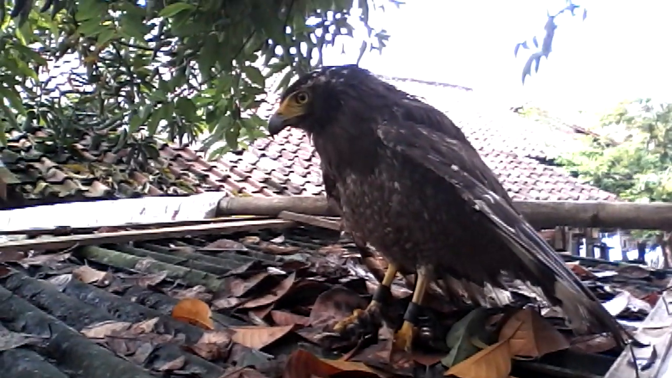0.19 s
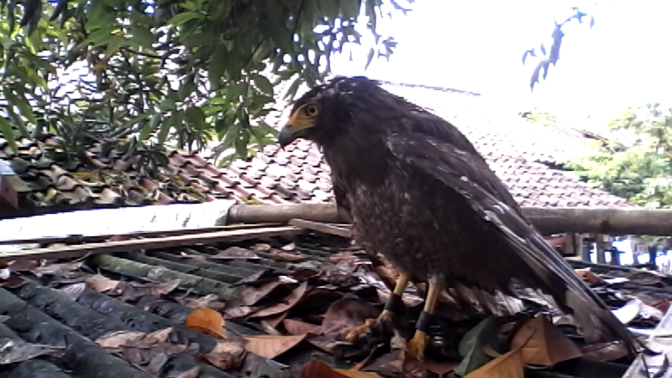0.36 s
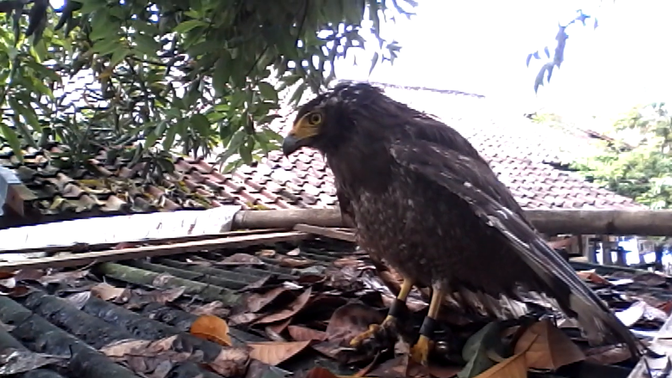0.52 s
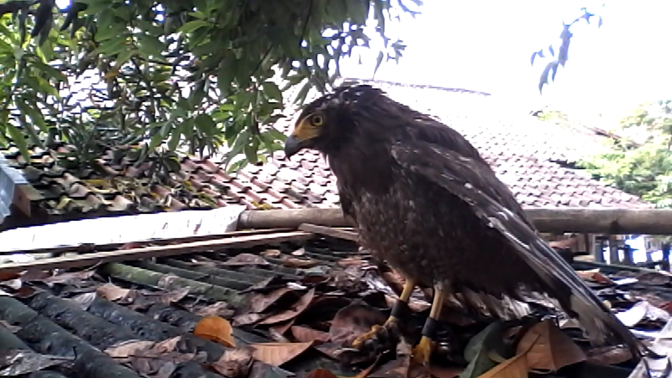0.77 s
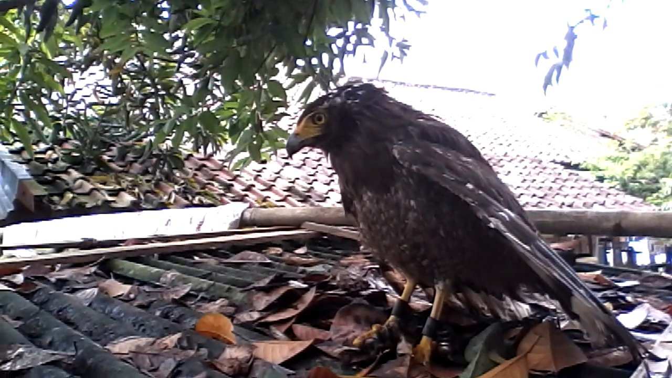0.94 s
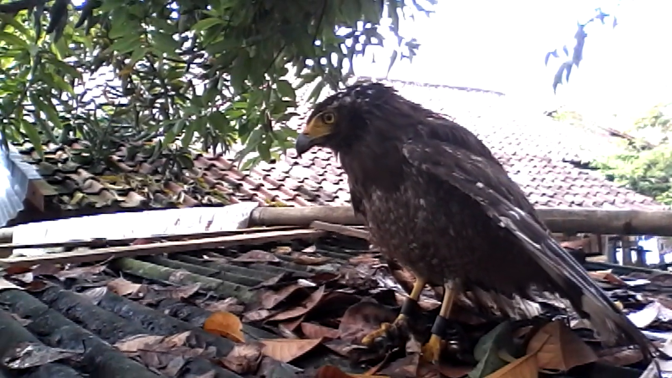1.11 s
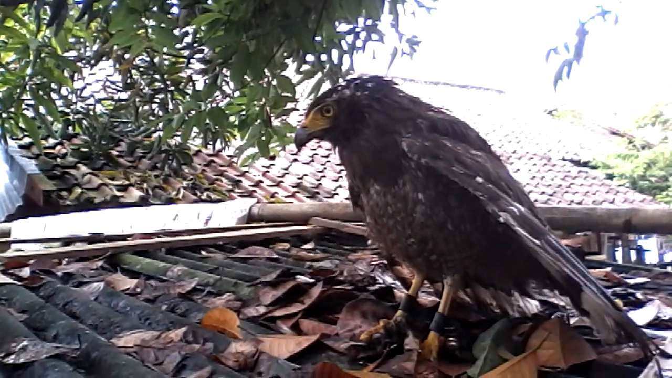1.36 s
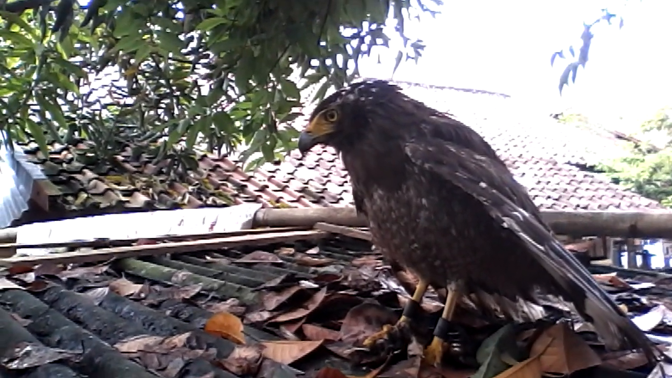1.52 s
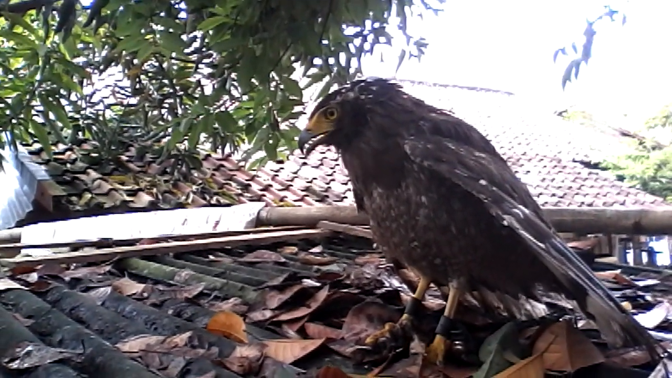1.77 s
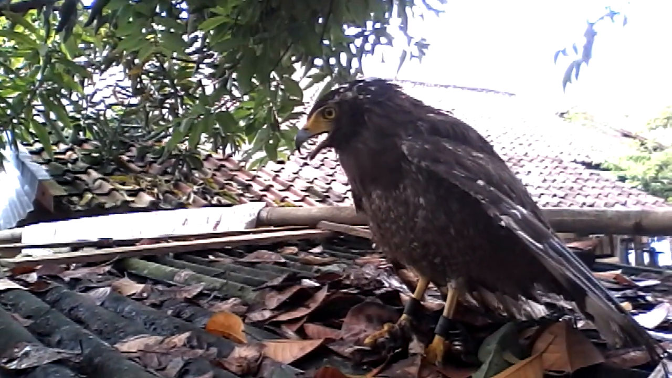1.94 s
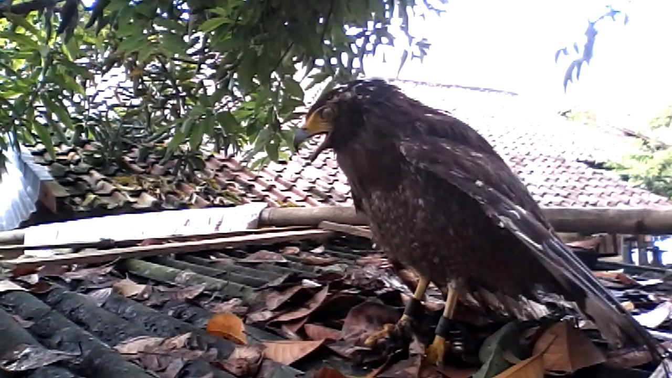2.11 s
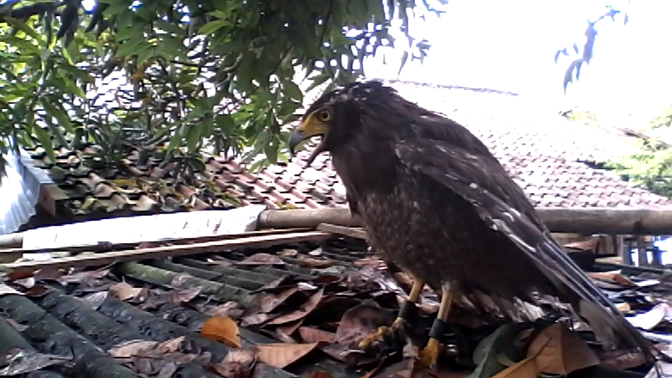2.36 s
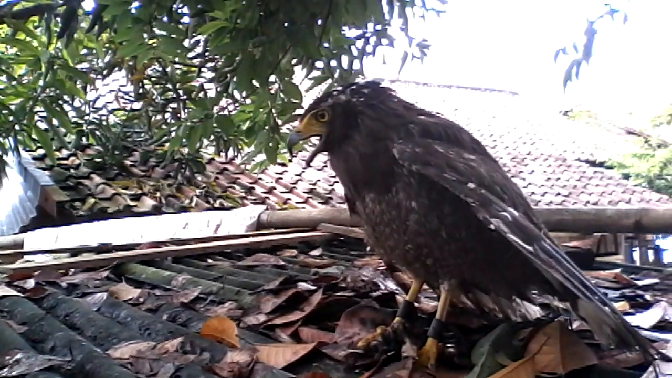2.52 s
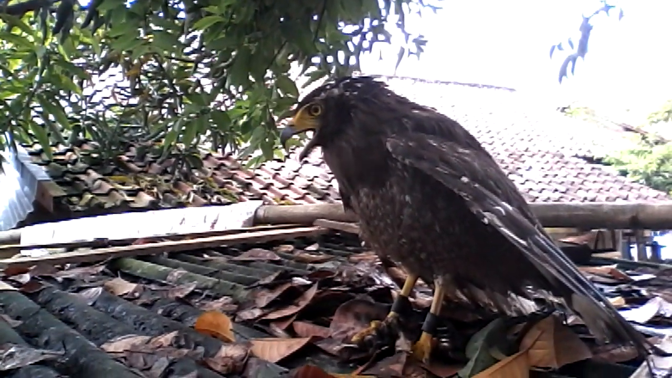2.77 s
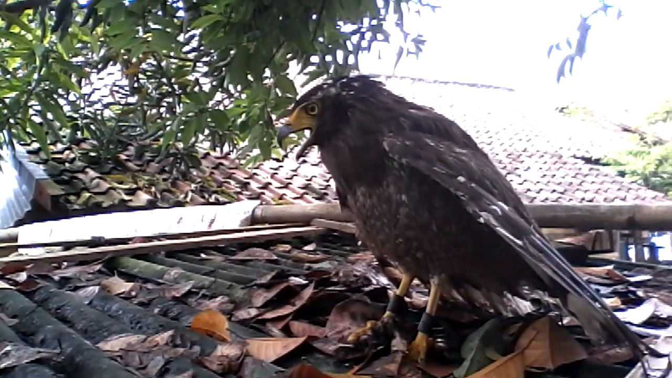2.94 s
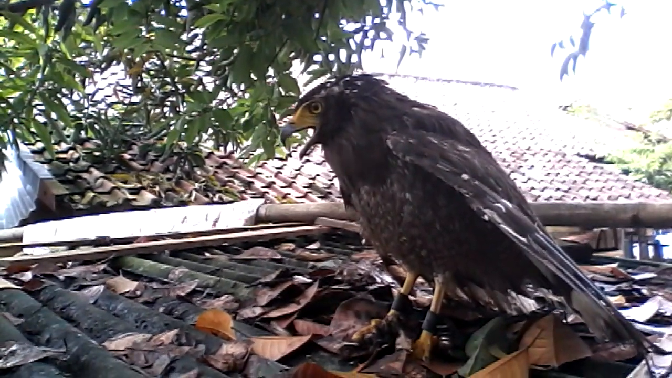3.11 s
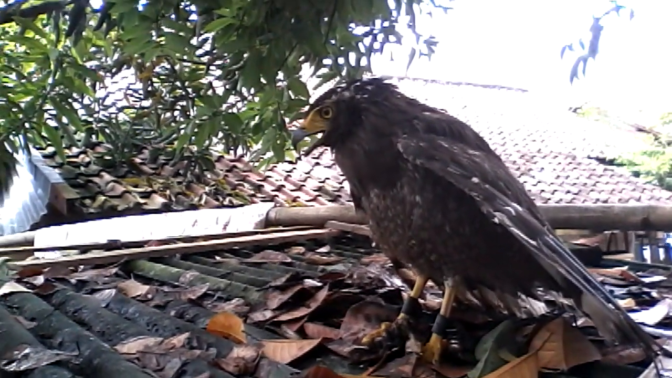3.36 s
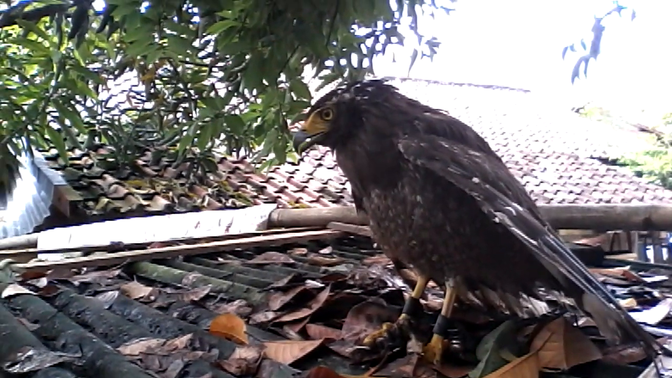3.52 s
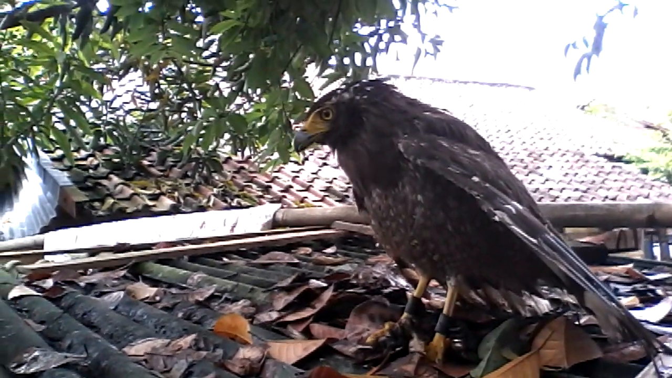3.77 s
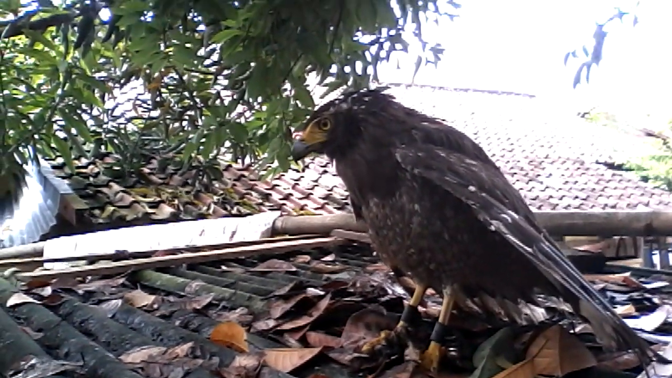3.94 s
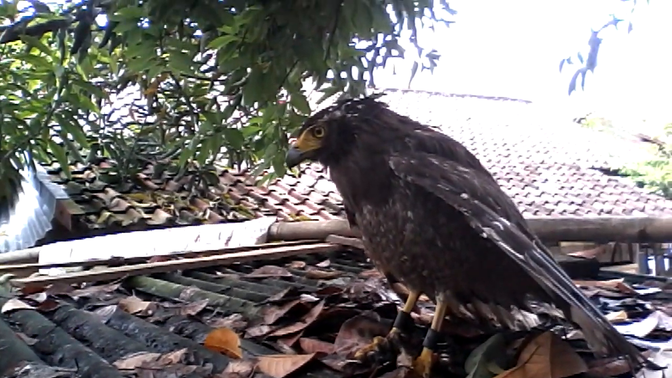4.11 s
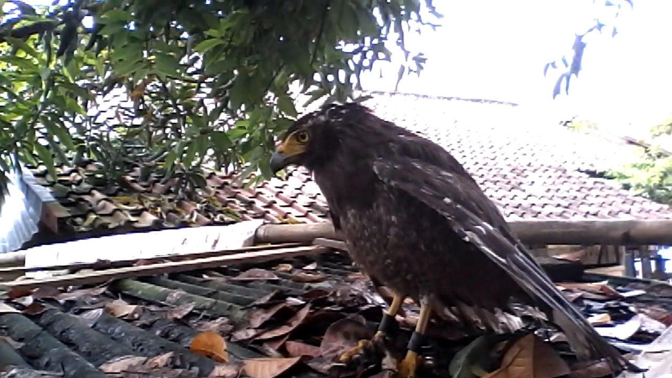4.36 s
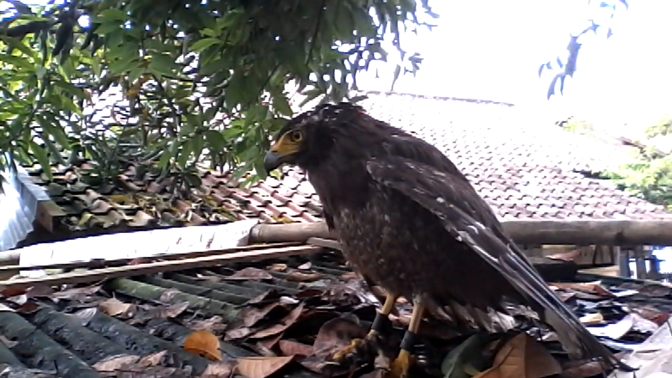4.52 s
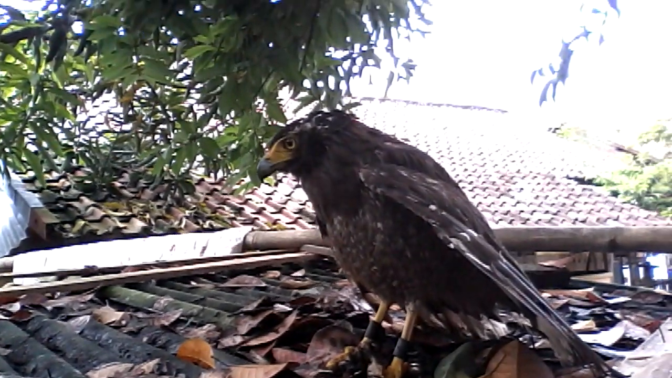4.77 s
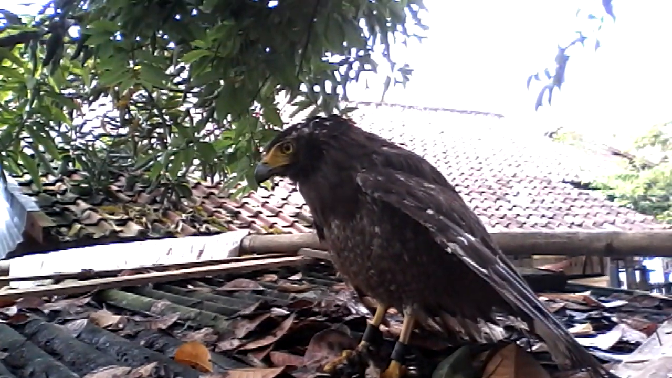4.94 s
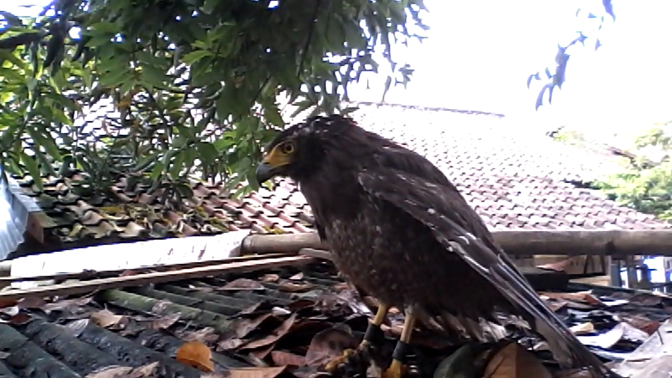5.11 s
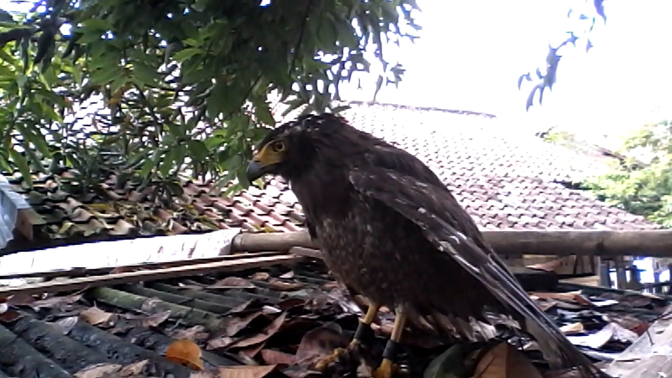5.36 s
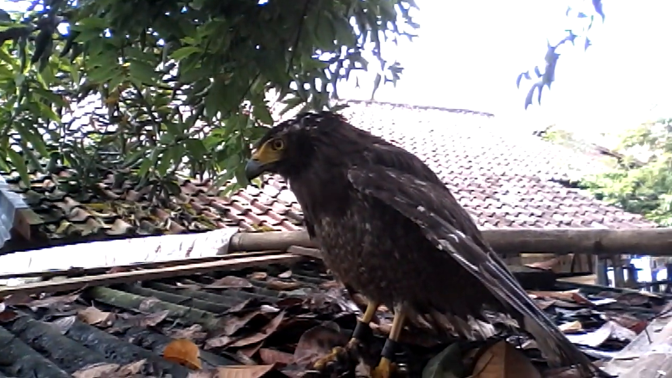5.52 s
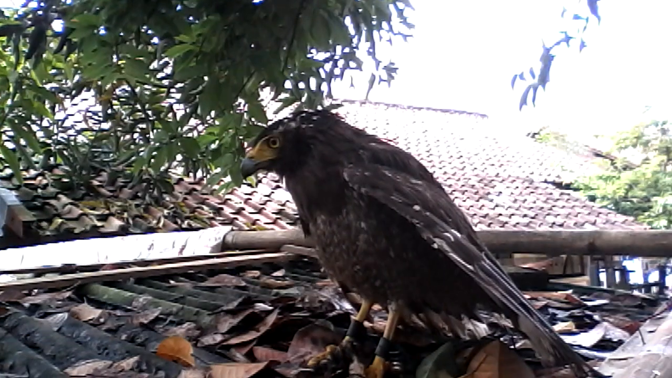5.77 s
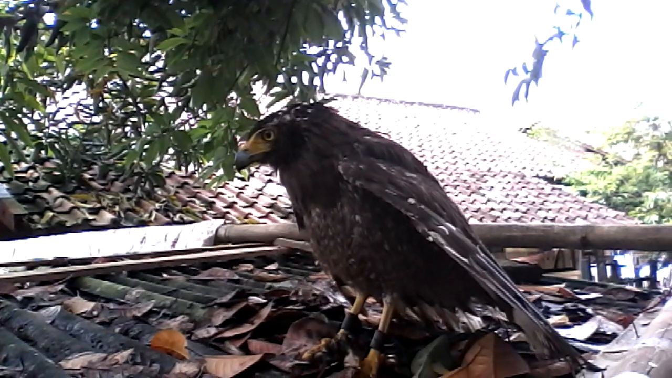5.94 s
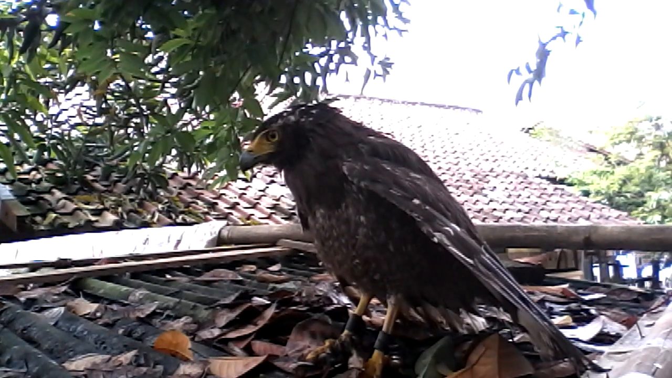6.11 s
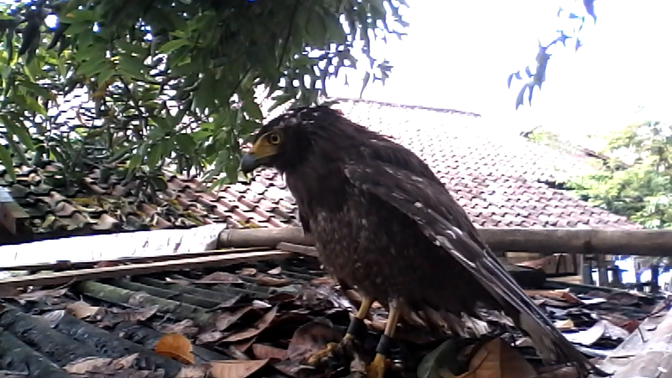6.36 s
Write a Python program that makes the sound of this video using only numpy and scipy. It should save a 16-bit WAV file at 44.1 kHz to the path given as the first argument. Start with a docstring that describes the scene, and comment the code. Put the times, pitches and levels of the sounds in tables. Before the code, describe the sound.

Quiet outdoor air and soft microphone hiss, with a few very faint chirps from small birds. After about two seconds an eagle close to the microphone gives one long, high, whistling scream with a hoarse edge, drooping in pitch at the end. Afterwards a hen clucks faintly across the yard, along with another tiny chirp and two soft, distant thuds.

```python
"""Eagle screaming on a roof

Close to the microphone, on a leaf-strewn roof, an eagle gives one long, hoarse scream. Its syrinx
whistles in an arch over the rasp of its breath, adds a fuzzy second voice, breaks to half pitch and
droops as the air runs out. Far off in the yard a hen cackles, small birds chirp and two soft thuds
sound, over quiet outdoor air and microphone hiss."""
import sys
import numpy as np
from scipy import signal
from scipy.fft import rfft, irfft
from scipy.io import wavfile
from scipy.ndimage import uniform_filter1d

SR = 44100
rng = np.random.default_rng(int(sys.argv[2]) if len(sys.argv) > 2 else 0)


def bounce(signal):
    """Save signal as a 16-bit WAV file at the path given by the first command-line argument."""
    frames = np.transpose(np.atleast_2d(signal))
    limited = np.clip(frames, -1, 1)
    pcm = np.round(limited * 32767).astype(np.int16)
    wavfile.write(sys.argv[1], SR, pcm)


N = 281799
TIME = np.arange(N) / SR

# spectrum of outdoor air and microphone hiss: frequency_hz, relative_db
AIR_SPECTRUM = [(18, -46), (30, -9.5), (130, -1), (169, -4.5), (270, -5), (333, -5), (390, -5.5), (832, -8),
                (900, -9.5), (2140, -13), (7300, -17), (15600, -17.5)]
# the hen, far off: start_s, length_s, pitch_hz, level_db, roughness (0-1)
HEN_CLUCKS = [(0.0, 0.082, 471.4, -60.5, 0.64), (4.04, .13, 438, -65, 0.68), (4.162, .098, 411.4, -63, 0.6),
              (4.333, 0.052, 536, -58.5, 0.37), (4.37, .14, 616.5, -60, 0.4),
              (4.482, 0.071, 518, -55.5, 0.85), (4.73, 0.032, 420, -60.5, 0.8),
              (4.809, 0.045, 589, -56, 0.3), (4.843, .031, 518, -56.5, 0.62),
              (5.007, 0.022, 339, -55.5, 0.46), (5.082, .078, 398.5, -57.5, 0.48),
              (5.351, 0.032, 420.5, -54.5, .1), (5.547, 0.041, 419, -59, .37),
              (5.723, 0.068, 396, -56.5, 0.44), (5.938, .075, 404, -58, .42),
              (6.133, 0.069, 411.3, -54.5, 0.48)]
# resonances of the hen's throat at her usual pitch: centre_hz, width_hz, gain_db
HEN_RESONANCES = [(620, 255, -6.5), (1287, 390, 0.5), (1540, 570, -7.5), (2080, 450, -11.5)]
# small birds, far off: start_s, length_s, start_hz, end_hz, level_db
BIRD_CHIRPS = [(.445, 0.031, 1966, 2086, -66), (0.458, 0.028, 2470, 2170, -65.5),
               (.92, 0.06, 525, 514, -70.5), (4.68, 0.03, 2070, 2360, -66)]
# loudness contour of the eagle's whistle: time_s, level_db
WHISTLE_CONTOUR = [(2.115, -39), (2.147, -32), (2.199, -40), (2.275, -31), (2.319, -35), (2.339, -24.5),
                   (2.371, -31.5), (2.383, -21.5), (2.533, -24), (2.565, -20), (2.709, -19), (2.737, -26),
                   (2.773, -18), (2.843, -24.5), (2.867, -22.5), (3.131, -24.5), (3.317, -21.5),
                   (3.333, -17), (3.485, -26.5), (3.501, -37), (3.541, -33), (3.56, -50.5)]
# resonances of the eagle's throat and open beak at top pitch: centre_hz, width_hz, gain_db
EAGLE_RESONANCES = [(744, 190, -23.5), (1253, 400, -14.5), (1710, 500, -26.5), (2340, 430, -13.5),
                    (2767, 270, 0), (3094, 64, -5), (3430, 160, -13.5), (3834, 410, -7), (4480, 140, -8),
                    (4873, 320, -2), (5333, 175, 7), (6420, 500, -13), (7470, 5800, -21.5),
                    (8285, 310, -11), (10740, 650, -17.5), (12270, 310, -14.5), (13260, 930, -21),
                    (14500, 2600, -36)]
# the second voice shifted by -1, 0, 1, 2, 3 whistle pitches: gain_db
COMBINATION_TONES = [-13, 3.5, -3.5, -21.5, -14.5]
# multiples 1, 3, 5 of the half pitch: gain_db
HALF_PITCH_PARTIALS = [0, -1.3, -2]
# soft thuds in the distance: start_s, length_s, centre_hz, level_db
DISTANT_THUDS = [(4.623, 0.074, 390, -61.5), (4.87, 0.16, 124, -63.5)]

# the scream starts, turns hoarse, its second voice jumps, its half pitch locks, it collapses, it ends
START_S, HOARSE_S, JUMP_S, LOCK_S, COLLAPSE_S, END_S = 2.113, 2.275, 2.45, 2.77, 3.553, 3.605


def amp(db):
    """Decibels to gain."""
    return 10 ** (np.asarray(db) / 20)


def unit(x):
    """Scales to rms 1."""
    return x / np.sqrt(np.mean(x ** 2) + 1e-20)


def add(mix, start_s, sound):
    """Mixes a sound in at its start time."""
    part = mix[max(round(start_s * SR), 0):][:len(sound)]
    part += sound[:len(part)]


def wander(rate_hz):
    """Random drift of rms 1, mostly slower than the rate."""
    hz = np.fft.rfftfreq(N, 1 / SR)
    return unit(irfft(rfft(rng.standard_normal(N)) / np.sqrt(1 + (hz / rate_hz) ** 4), N))


def humps(modes, hz):
    """Gain of a set of steep-sided resonances."""
    power = sum(amp(db) ** 2 * .5 ** ((2 * (hz - centre) / width) ** 2) for centre, width, db in modes)
    return np.sqrt(power + 1e-12)


def step(at_s, width_s):
    """A smooth change from 0 to 1 around a moment."""
    return .5 + .5 * np.tanh((TIME - at_s) / width_s)


def phase_of(hz):
    """Running phase of a changing pitch, in radians."""
    return 2 * np.pi * np.cumsum(hz) / SR


def outdoor_air(level_db=-58, whine_hz=7350, rumble_hz=83, low_cut_hz=58):
    """Gently swelling murmur and rumble all around, with a faint narrow band in the hiss."""
    hz = np.fft.rfftfreq(N, 1 / SR)
    points_hz, points_db = np.transpose(AIR_SPECTRUM)
    colour = amp(np.interp(np.log(hz + 1), np.log(points_hz), points_db))
    colour *= 1 + .49 * humps([(whine_hz, 450, 0)], hz) + .304 * humps([(rumble_hz, 17, 0)], hz)
    colour *= .4 + .57 / (1 + (low_cut_hz / (hz + 1)) ** 8)  # the small microphone loses deep bass
    swell = amp(.3 * wander(3))
    return amp(level_db) * swell * unit(irfft(rfft(rng.standard_normal(N)) * colour, N))


def hen(arch=.081, jitter=.023, usual_hz=455):
    """Each cluck is a short, shaky arch of pulses and noise through the throat."""
    out, shake = np.zeros(N), jitter * wander(120)
    for start_s, length_s, pitch_hz, level_db, rough in HEN_CLUCKS:
        size = int(length_s * SR)
        bend = arch * (np.sin(2.14 * np.linspace(0, 1, size)) - .8)
        phase = phase_of(pitch_hz * (1 + bend + shake[round(start_s * SR):][:size]))
        pulses = sum(np.cos(k * phase) for k in range(1, 7))
        drive = (1 - rough) * pulses + rough * 3.5 * rng.standard_normal(size)
        beak = (pitch_hz / usual_hz) ** .46  # opens wider for higher clucks
        voice = irfft(rfft(drive) * humps(HEN_RESONANCES, np.fft.rfftfreq(size, 1 / SR) / beak), size)
        add(out, start_s, amp(level_db) * unit(voice) * signal.windows.tukey(size, .4))
    return out


def yard_echoes(sound, t60_s, treble_hz):
    """Scattered echoes from tiles, walls and leaves; the treble dies sooner."""
    taps = rng.choice([-1., 1.], SR) * (rng.random(SR) < 2000 / SR) * (np.arange(SR) > .004 * SR)
    hz, t, spectrum = signal.stft(taps, SR, nperseg=256)
    decay = amp(-60 * t * (1 + hz[:, None] / treble_hz) / t60_s)
    tail = signal.istft(spectrum * decay, SR, nperseg=256)[1]
    return signal.fftconvolve(sound, tail / np.linalg.norm(tail))[:N]


def small_birds():
    """Short gliding whistles from across the yard."""
    out = np.zeros(N)
    for start_s, length_s, start_hz, end_hz, level_db in BIRD_CHIRPS:
        hz = np.linspace(start_hz, end_hz, int(length_s * SR))
        add(out, start_s, amp(level_db) * unit(np.sin(phase_of(hz)) * np.hanning(len(hz))))
    return out


def scream_pitch(whistle_db, jumped, ceiling_hz=2793.4, lift_hz=18, sag_hz_per_db=4):
    """The pitch scoops up, climbs slowly, droops as the air runs out and drops at the collapse."""
    t = np.clip(TIME, START_S, END_S)
    scoop_hz = 420 * np.exp((START_S - t) / .026)
    climb_hz = 172 * np.exp((START_S - t) / .3)
    droop_hz = 741 * np.exp((t - END_S) / .082)
    drop_hz = 791.5 * step(COLLAPSE_S + .007, .0188)
    surge_db = whistle_db - uniform_filter1d(whistle_db, size=SR // 4)
    held = jumped * (1 - step(COLLAPSE_S - .15, .03))
    sag_hz = sag_hz_per_db * surge_db * held  # the held note dips whenever it surges
    return ceiling_hz - scoop_hz - climb_hz - droop_hz - drop_hz - lift_hz * (1 - jumped) - sag_hz


def breath(build_s=.11, fail_s=.03):
    """The air stream, in dB relative to full: it builds, holds, and fails just before the collapse."""
    t = np.clip(TIME, START_S, COLLAPSE_S)
    return -29 * np.exp((START_S - t) / build_s) - 18.5 * np.exp((t - COLLAPSE_S) / fail_s)


def eagle(flutter_hz=262, rough_start=.092, rough_peak=.99, rough_held=.336, rasp_db=-28.5):
    """A tight syrinx whistles; flutter, a second voice and turbulence make it hoarse."""
    contour_s, contour_db = np.transpose(WHISTLE_CONTOUR)
    whistle_db = np.interp(TIME, contour_s, contour_db)
    breath_db, jumped = breath(), step(JUMP_S, .012)
    pitch_hz = scream_pitch(whistle_db, jumped)
    rough = rough_start + (rough_peak - rough_start) * step(HOARSE_S, .02)
    rough += (rough_held - rough_peak) * jumped
    stretch = (pitch_hz / pitch_hz.max()) ** .52  # the throat tightens with the pitch
    fade = amp(-700 * np.maximum(TIME - COLLAPSE_S, 0))  # at the end only the lowest tones are left

    octave_db = -33.5 + 4 * jumped + .18 * (whistle_db - np.median(contour_db)) + 2 * wander(23)
    octave_db -= 5 * (rough - rough_held)  # roughness eats the octave
    octave_gain = amp(octave_db) * step(START_S + .013, .011) * (1 - step(COLLAPSE_S - .016, .011))
    strain = amp(.5 * breath_db)  # the harder the breath, the more the membranes flutter
    flutter = strain * np.sin(phase_of(flutter_hz * (1 + .042 * wander(60))))
    jitter = .0029 * wander(67.8) + .013 * rough * wander(437)
    phase = phase_of(pitch_hz * (1 + jitter)) + .11 * flutter
    whistle_gain = amp(whistle_db + 2.5 + 1.5 * rough * wander(35)) * fade ** .3
    whistle = whistle_gain * np.cos(phase) + octave_gain * np.cos(2 * phase)
    stutter = .3 * rough ** 2 * wander(130)
    whistle *= 1 + .03 * flutter + stutter

    # the third to fifth harmonics stand out only where the throat resonates
    upper = sum(humps(EAGLE_RESONANCES, k * pitch_hz / stretch) * np.cos(k * phase) / (k - 2)
                for k in range(3, 6))
    hoarse = amp(-1) * octave_gain * upper * (1 - step(COLLAPSE_S - .08, .048))
    hoarse += amp(rasp_db + breath_db) * rasp(phase, flutter, stretch)
    hoarse += second_voice(phase, breath_db, stretch, jumped)
    gate = np.clip((TIME - START_S) / .0055, 0, 1) * np.clip((END_S - TIME) / .02, 0, 1)
    return gate * (whistle + half_pitch(phase, breath_db, fade)) + off_the_roof(gate * fade * hoarse)


def rasp(phase, flutter, stretch):
    """Turbulent puffs of air through the throat, whose resonances slide as it stretches."""
    puffs = rng.standard_normal(N) * (1 + .37 * np.cos(phase)) * (1 + .16 * flutter)
    hz, t, spectrum = signal.stft(puffs, SR, nperseg=512, noverlap=384)
    throat = humps(EAGLE_RESONANCES, hz[:, None] / np.interp(t, TIME, stretch))
    return unit(signal.istft(spectrum * throat, SR, nperseg=512, noverlap=384)[1][:N])


def off_the_roof(sound, t60_s=.078, reflection_db=-4):
    """Quick reflections off the roof comb the treble, which the beak beams away from the microphone."""
    t = np.arange(SR // 10) / SR
    taps = rng.choice([-1., 1.], len(t)) * (rng.random(len(t)) < 1500 / SR)
    taps *= amp(-60 * t / t60_s) * (t > .001)
    reflections = signal.fftconvolve(sound, taps / np.linalg.norm(taps))[:N]
    return (sound + amp(reflection_db) * reflections) / np.hypot(1, amp(reflection_db))


def second_voice(phase, breath_db, stretch, jumped, low_hz=3443, high_hz=3886, fuzz=.0221):
    """The other side of the syrinx shares the air stream, making sum and difference tones."""
    hz = (low_hz + (high_hz - low_hz) * jumped) * stretch ** .35
    level_db = -44 + 3.5 * jumped + .9 * breath_db
    own_phase = phase_of(hz * (1 + fuzz * wander(402)))
    return sum(amp(level_db + db) * np.cos(own_phase + shift * phase)
               for shift, db in enumerate(COMBINATION_TONES, start=-1))


def half_pitch(phase, breath_db, fade, slip_hz=110, flat_hz=40, tire_db_per_s=5):
    """Every second cycle weakens: the half pitch slips, locks, and outlasts the whistle as a squeak."""
    locked = step(LOCK_S, .016)
    slip = phase_of((1 - locked) * (slip_hz * wander(307.5) - flat_hz))
    held_db = -43 + locked * (4.5 - tire_db_per_s * (TIME - LOCK_S)) + 1.15 * breath_db
    held = amp(held_db) * (1 - step(COLLAPSE_S - .025, .008))
    squeak = amp(-47) * step(COLLAPSE_S + .0099, .006)
    return (held + squeak) * sum(amp(db) * fade ** k * np.cos((k + .5) * phase + slip)
                                 for k, db in enumerate(HALF_PITCH_PARTIALS))


def thuds():
    """Dull swells of low noise in the distance."""
    out = np.zeros(N)
    for start_s, length_s, centre_hz, level_db in DISTANT_THUDS:
        size = int(length_s * SR)
        band = humps([(centre_hz, .62 * centre_hz, 0)], np.fft.rfftfreq(size, 1 / SR))
        body = irfft(rfft(rng.standard_normal(size)) * band, size)
        add(out, start_s, amp(level_db) * unit(body * np.hanning(size)))
    return out


def scene():
    """One microphone: the eagle close and nearly dry, the other birds far off in the yard's echoes."""
    near, far = eagle(), hen() + small_birds()
    near = near + amp(-21) * yard_echoes(near, t60_s=.48, treble_hz=20000)
    far = amp(-1) * far + amp(-2) * yard_echoes(far, t60_s=.45, treble_hz=7000)
    return (near + far + thuds() + outdoor_air())[None]


def record(dry):
    """The recorder cuts off the highest treble."""
    low_pass = signal.firwin(1023, cutoff=15750, window=("kaiser", 10), fs=SR)
    return signal.oaconvolve(dry, low_pass[None], "same")


dry = scene()
out = record(dry)
bounce(out)
```